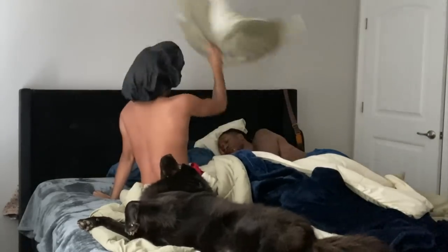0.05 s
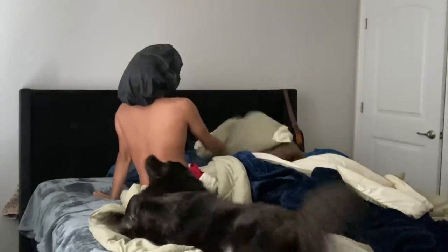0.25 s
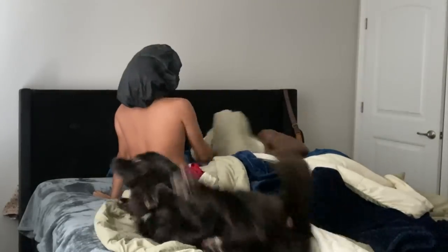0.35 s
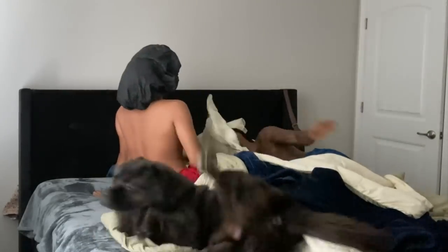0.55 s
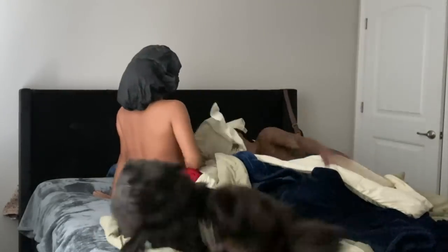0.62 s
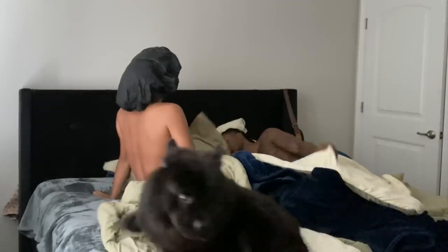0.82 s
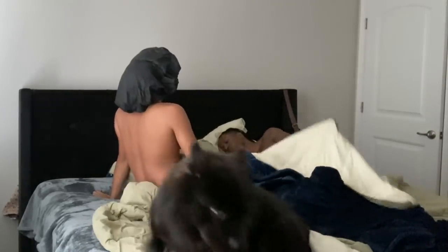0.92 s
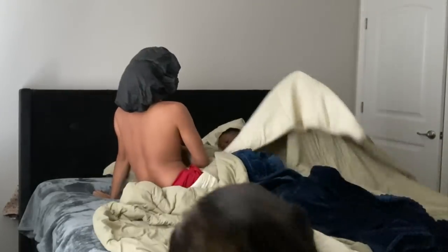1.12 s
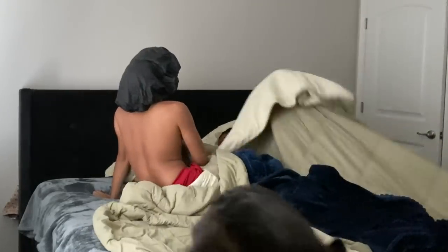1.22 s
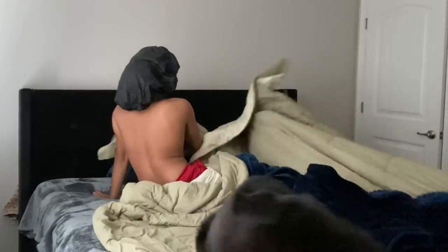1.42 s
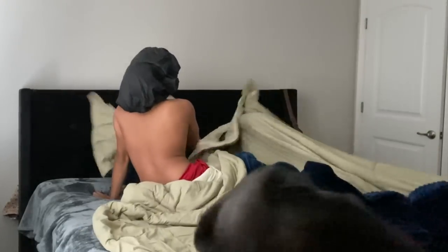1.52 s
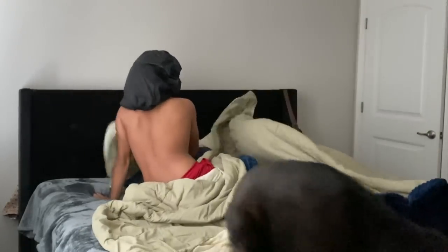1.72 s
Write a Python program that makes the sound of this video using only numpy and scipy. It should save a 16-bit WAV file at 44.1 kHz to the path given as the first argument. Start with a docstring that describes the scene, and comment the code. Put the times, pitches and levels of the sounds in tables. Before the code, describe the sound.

A pillow swishes and lands on a bed with one dull thump. Then bedding softly flaps and drags while the mattress bumps under shifting weight, with one small sharp tick, in a small bedroom.

```python
"""Pillow blow and shifting bedding.

A pillow is swung onto a bed in a small bedroom: a swish, the cover smacks, the filling crushes,
a push of air booms in the room. Then bedding is flapped and dragged while a dog gets up.
The mattress rumbles and something ticks twice, faintly then sharply."""
import sys
import numpy as np
from scipy import signal
from scipy.fft import rfft, irfft
from scipy.io import wavfile

SR = 44100
rng = np.random.default_rng(int(sys.argv[2]) if len(sys.argv) > 2 else 0)


def wav_record(signal):
    """Record a signal, one row per channel, as 16-bit PCM in the file named by sys.argv[1]."""
    frames = np.transpose(np.atleast_2d(signal))
    bounded = np.clip(frames, -1, 1)
    # unit amplitude maps onto the largest positive 16-bit level
    quanta = np.round(bounded * 32767).astype(np.int16)
    wavfile.write(sys.argv[1], SR, quanta)


N = 77175

# Cloth strokes. Each row: start, attack, hold and release in seconds, level in dB.
CRUSH_STROKES = [(0.207, 0.002, 0.033, 0.036, -25), (0.221, 0.005, 0.0033, 0.0025, -23),
                 (0.239, 0.0013, 0.0047, 0.0016, -24), (0.258, 0.0074, 0.0029, 0.0019, -29.5)]  # filling collapsing in stages
SMACK_STROKES = [(0.196, 0.01, 0.023, 0.021, -32)]  # cover slapping down
SKID_STROKES = [(0.25, 0.01, 0.062, 0.0092, -55.5)]  # cover sliding on after contact
SWISH_STROKES = [(0.135, 0.023, 0.0064, 0.0054, -36.5), (0.168, 0.0036, 0.0061, 0.0028, -30),
                 (1.635, 0.016, 0.005, 0.011, -46)]  # pillow and sheet through the air
FLAP_STROKES = [(0.637, 0.003, 0.016, 0.0054, -39.5), (0.663, 0.002, 0.013, 0.011, -37.5),
                (0.847, 0.0039, 0.011, 0.015, -52), (1.1, 0.0026, 0.005, 0.03, -50),
                (1.538, 0.0013, 0.0031, 0.0032, -43), (1.553, 0.002, 0.0056, 0.012, -47)]
BRUSH_STROKES = [(0.072, 0.0096, 0.007, 0.0067, -64.5), (0.355, 0.0073, 0.0095, 0.022, -54),
                 (0.574, 0.0013, 0.0031, 0.0087, -55), (0.638, 0.0055, 0.0064, 0.003, -48.5)]

# Source spectra. Each row: frequency in Hz, relative gain in dB.
CRUSH_SPECTRUM = [(160, 1), (260, -2.5), (340, -6), (440, 0), (540, -11.5), (760, 0), (900, -6),
                  (1170, -19), (1400, -16), (1650, -32), (2200, -27.5), (3200, -29), (6000, -36),
                  (15000, -118)]
SMACK_SPECTRUM = [(700, 0), (1400, -1), (2100, -3), (3000, -11.5), (4300, -14), (6000, -19), (10000, -19),
                  (15000, -37.5)]
SKID_SPECTRUM = [(400, -8), (800, 5), (2000, 0), (5000, 5), (9500, 20), (15000, 5)]
SWISH_SPECTRUM = [(80, -5), (170, 10.5), (280, -8), (400, 4), (560, -6), (900, -9), (2000, -31),
                  (5000, -43.5), (15000, -64)]
FLAP_SPECTRUM = [(160, 3.5), (400, -2), (800, -10), (1200, -10.5), (1700, -13.5), (2500, -19),
                 (3400, -25.5), (5400, -34.5), (7500, -38.5), (10400, -40), (15000, -63)]
BRUSH_SPECTRUM = [(300, -25), (1000, 6), (2200, 12.5), (4500, 3.5), (8000, -7), (15000, -19)]
DRAG_SPECTRUM = [(190, -4), (280, -5), (400, -8.5), (520, -11), (700, -14), (1200, -19.5), (2200, -24),
                 (4000, -47.5), (8000, -46.5)]
HISS_SPECTRUM = [(1000, 0), (3500, 2.5), (7000, -5), (10000, -1), (15000, -15)]
TICK_SPECTRUM = [(500, -13), (2500, -11), (4500, -5), (7000, -10.5), (9500, -3), (15000, -1.5)]
RUMBLE_SPECTRUM = [(20, -3), (38, -6), (54, -2), (80, 3.5), (105, -12), (130, -2.5), (200, -18),
                   (320, -32.5), (900, -65.5)]

# Level curves. Each row: time in seconds, level in dB.
DRAG_LEVELS = [(0, -56), (0.12, -56.5), (0.42, -52.5), (0.52, -59), (0.62, -52.5), (0.72, -55), (0.8, -55),
               (1.03, -56), (1.12, -54), (1.23, -54.5), (1.34, -55.5), (1.52, -56), (1.58, -53),
               (1.75, -57.5)]
HISS_LEVELS = [(0, -106), (0.16, -80), (0.4, -79), (0.5, -70.5), (0.8, -70.5), (1.05, -72.5), (1.28, -67.5),
               (1.44, -72.5), (1.57, -69.5), (1.68, -85), (1.75, -67)]
RUMBLE_LEVELS = [(0, -44.5), (0.15, -38), (0.45, -42.5), (0.55, -44.5), (0.748, -47), (0.88, -46.5),
                 (1.12, -44), (1.38, -45.5), (1.46, -50.5), (1.56, -40), (1.75, -45)]

# Resonances of the blow. Each row: centre and width in Hz, boost in dB.
BLOW_RESONANCES = [(212, 18.4, 5), (415, 40, -2.5), (475.6, 41, 6.5), (666, 21, 1), (784, 30, 7),
                   (975, 48, -0.5), (1370, 100, 6), (2020, 160, 2.5), (2266, 15, 5.5)]
# Air driven ahead of the pillow, air squeezed out, then the mattress rebounding.
# Each row: time in seconds, pitch in Hz, level in dB.
AIR_PUSHES = [(0.187, 108, -22.5), (0.231, 81.2, -5), (0.2716, 109, -21), (0.2794, 117, -21)]
# Low modes of bed and room. Each row: frequency in Hz, relative level in dB,
# T60 and delay in seconds, left minus right in dB.
LOW_MODES = [(53.4, -12.5, 0.45, 0.01015, -1.5), (132.2, -18, 0.16, 0.00814, 2.5),
             (210.5, -25, 0.21, 0.00732, 5.5)]
# Weight shifting on the mattress. Each row: time in seconds, level in dB, mode gain in dB.
WEIGHT_BUMPS = [(0.069, -50, -7), (0.098, -37, 3), (0.427, -33, 9.5), (0.657, -38, 14.5),
                (0.706, -33.5, 13.5), (0.793, -33, -6), (0.961, -33.5, 10.5), (1.021, -29.5, -3),
                (1.098, -31, 9), (1.133, -41, 11), (1.19, -37.5, 3), (1.27, -32.5, 5), (1.519, -32.5, 3),
                (1.625, -32, -4), (1.663, -35, 3)]
# Ticks. Each row: time in seconds, relative level in dB, tilt in dB per octave.
TICK_EVENTS = [(0.5756, -28.5, -5), (0.9041, -15.5, 0)]
# Bedroom decay. Each row: frequency in Hz, T60 in seconds.
ROOM_DECAY = [(100, 0.29), (500, 0.28), (2000, 0.27), (6000, 0.38), (15000, 0.14)]


def pillow():
    """A swung pillow swishes, smacks, crushes and skids; the air it displaces booms."""
    crush = room(strokes(CRUSH_STROKES, CRUSH_SPECTRUM, BLOW_RESONANCES), tail_db=-5, lag_s=0.00028)
    smack = strokes(SMACK_STROKES, SMACK_SPECTRUM, BLOW_RESONANCES)
    skid = strokes(SKID_STROKES, SKID_SPECTRUM)
    cover = room(smack + skid, tail_db=4, lag_s=0.00007)
    swishes = room(strokes(SWISH_STROKES, SWISH_SPECTRUM), tail_db=0, lag_s=-0.00034)
    boom = sum(undb(db) * thud(at_s, hz, ring_db=3) for at_s, hz, db in AIR_PUSHES)
    return pan(crush, db=3.5) + cover + swishes + boom


def bedding():
    """Cloth flaps and brushes; the dragged sheet rubs and hisses."""
    drag = unit(colour(cloth(), DRAG_SPECTRUM)) * envelope(DRAG_LEVELS)
    hiss = unit(colour(cloth(), HISS_SPECTRUM)) * envelope(HISS_LEVELS)
    flaps = room(strokes(FLAP_STROKES, FLAP_SPECTRUM), tail_db=-0.5, lag_s=0.00019)
    brushes = room(strokes(BRUSH_STROKES, BRUSH_SPECTRUM), tail_db=-2.5, lag_s=0.00005)
    slide = room(drag + hiss, tail_db=2.5, lag_s=0.000291)
    return pan(flaps + brushes + slide, db=1)


def ticks(pivot_hz=4260, tail_db=0.5):
    """Tiny bright snaps, slightly right, excite the room."""
    snaps = 0
    for at_s, db, tilt in TICK_EVENTS:
        spectrum = [(hz, gain_db + tilt * np.log2(hz / pivot_hz)) for hz, gain_db in TICK_SPECTRUM]
        impulse = np.sinc((times() - at_s) * SR)
        snaps = snaps + undb(db) * colour(impulse, spectrum)
    return room(snaps, tail_db, lag_s=0.00011, build_s=0.0093) * np.hypot(1, undb(tail_db))


def mattress(bump_hz=72.2, side_db=-18):
    """Shifting weight bumps softly over a low rumble."""
    mid, side = (unit(colour(rng.standard_normal(N), RUMBLE_SPECTRUM)) for _ in range(2))
    rumble = envelope(RUMBLE_LEVELS) * (mid + undb(side_db) * side * np.array([[1], [-1]]))
    bumps = sum(undb(db) * thud(at_s, bump_hz, ring_db) for at_s, db, ring_db in WEIGHT_BUMPS)
    return pan(rumble + bumps, db=-0.5)


def thud(at_s, hz, ring_db):
    """One smooth push of air, then the low modes ring."""
    t = times() - at_s
    u = (np.pi * hz * t) ** 2
    sound = (1 - 2 * u) * np.exp(-u)  # Ricker pulse
    for mode_hz, db, t60_s, delay_s, pan_db in LOW_MODES:
        age_s = np.maximum(t - delay_s, 0)
        ring = np.sin(2 * np.pi * mode_hz * age_s) * np.exp(-np.log(1000) * age_s / t60_s)
        sound = sound + undb(db + ring_db) * pan(ring, pan_db)
    return sound


def strokes(rows, spectrum, resonances=()):
    """Cloth friction that swells, holds and dies away."""
    t, gain = times(), 0
    for start_s, attack_s, hold_s, release_s, db in rows:
        rise = np.clip((t - start_s) / attack_s, 0, 1) ** 2
        fall = np.exp(-np.maximum(t - start_s - attack_s - hold_s, 0) / release_s)
        gain = gain + undb(db) * rise * fall
    friction = cloth()
    steady_rms = np.std(colour(friction, spectrum, resonances))
    return colour(friction * gain, spectrum, resonances) / steady_rms


def cloth(creases_per_s=2500, spread_db=4):
    """Fibre friction with many tiny creases snapping in it."""
    onsets = rng.random(N) < creases_per_s / SR
    creases = onsets * rng.standard_normal(N) * undb(spread_db * rng.standard_normal(N))
    return unit(unit(creases) + 0.58 * rng.standard_normal(N))


def room(x, tail_db, lag_s, build_s=0.0066, mono_below_hz=186):
    """Direct sound, left ear late by lag_s, plus the bedroom's diffuse tail."""
    t, f = times(), freqs()
    mid, side = rfft(rng.standard_normal((2, 2 * N)))
    width = f ** 2 / np.hypot(f ** 2, mono_below_hz ** 2)
    field = (mid + side * width * np.array([[1], [-1]])) / np.sqrt(1 + width ** 2)
    tail = 0
    for band_hz, t60_s in ROOM_DECAY:
        band = log_interp([(hz, float(hz == band_hz)) for hz, _ in ROOM_DECAY], f)
        tail = tail + irfft(field * band)[:, :N] * np.exp(-np.log(1000) * t / t60_s)
    tail *= np.sqrt(np.clip(t / build_s, 0, 1))
    tail /= np.sqrt(np.sum(tail ** 2) / 2)
    direct = np.exp(-2j * np.pi * f * np.array([[lag_s], [0]]))
    response = direct + undb(tail_db) * rfft(tail, 2 * N)
    return irfft(rfft(x, 2 * N) * response)[:, :N] / np.hypot(1, undb(tail_db))


def colour(x, spectrum, resonances=()):
    """Minimum-phase filter through (Hz, dB) points, rolling off below the first."""
    f = freqs()
    db = log_interp(spectrum, f) - 10 * np.log10(1 + (spectrum[0][0] / (f + 1)) ** 4)
    for hz, width_hz, boost_db in resonances:
        db += boost_db / (1 + (2 * (f - hz) / width_hz) ** 2)
    cepstrum = irfft(np.log(undb(db)))
    cepstrum[1:N] *= 2
    cepstrum[N + 1:] = 0
    return irfft(rfft(x, 2 * N) * np.exp(rfft(cepstrum)))[..., :N]


def log_interp(points, hz):
    """Read (Hz, value) points on a log-frequency axis."""
    knots_hz, values = np.array(sorted(points), float).T
    return np.interp(np.log(hz), np.log(knots_hz), values)


def envelope(levels):
    """Gain per sample from (s, dB) points."""
    return undb(np.interp(times(), *np.array(levels).T))


def pan(x, db):
    """Left louder than right by db."""
    return x * undb(np.array([[db], [-db]]) / 2)


def undb(db):
    """Decibels to gain."""
    return 10 ** (np.asarray(db) / 20)


def unit(x):
    """Scale to rms 1."""
    return x / np.sqrt(np.mean(x ** 2))


def times():
    """Sample times in seconds."""
    return np.arange(N) / SR


def freqs():
    """Bins of a double-length spectrum in Hz."""
    return np.arange(N + 1) * SR / (2 * N) + 1e-6


def scene():
    """Stereo sum of all sources."""
    return pillow() + bedding() + mattress() + ticks()


def record(dry):
    """Cut the deepest bass and the top treble."""
    low_cut_hz, top_hz = 37, 15900
    highpass = 1 / np.sqrt(1 + (low_cut_hz / (freqs() + 1)) ** 16)
    lowpass = signal.ellip(8, 0.2, 80, top_hz, fs=SR, output="sos")
    return signal.sosfilt(lowpass, irfft(rfft(dry, 2 * N) * highpass)[:, :N])


dry = scene()
out = record(dry)
wav_record(out)
```